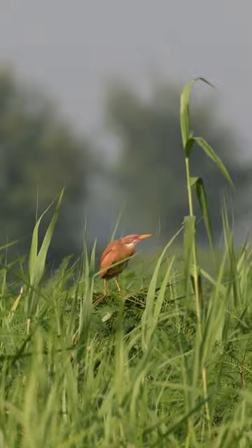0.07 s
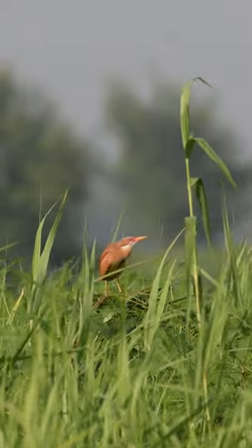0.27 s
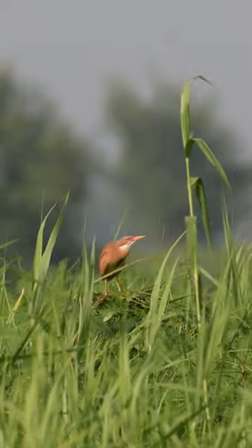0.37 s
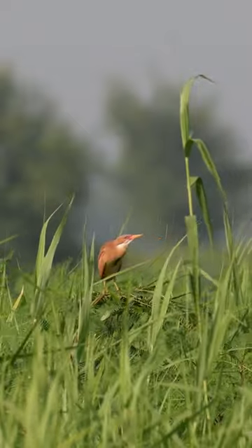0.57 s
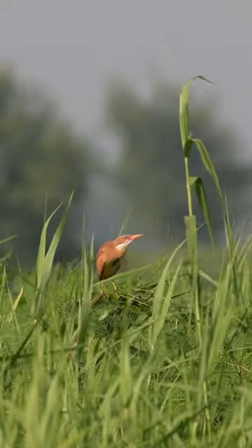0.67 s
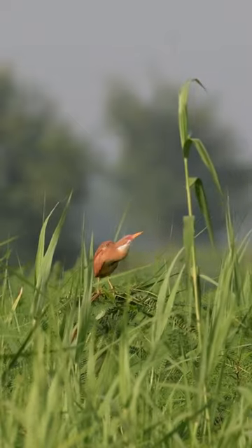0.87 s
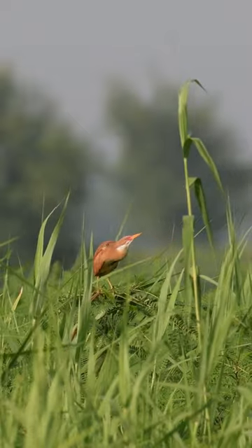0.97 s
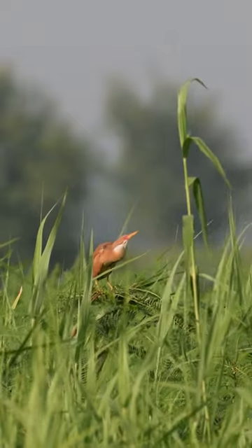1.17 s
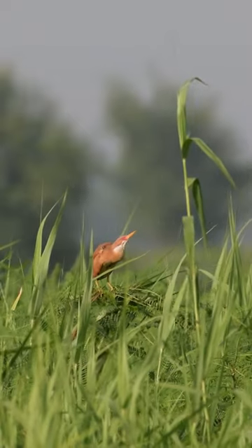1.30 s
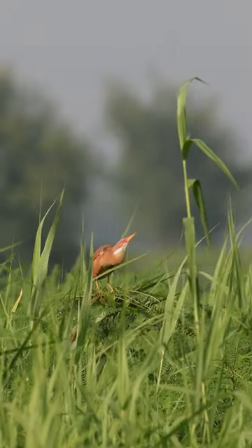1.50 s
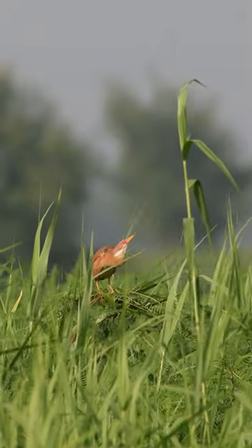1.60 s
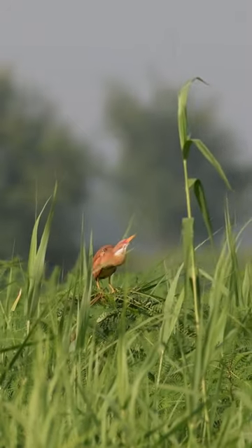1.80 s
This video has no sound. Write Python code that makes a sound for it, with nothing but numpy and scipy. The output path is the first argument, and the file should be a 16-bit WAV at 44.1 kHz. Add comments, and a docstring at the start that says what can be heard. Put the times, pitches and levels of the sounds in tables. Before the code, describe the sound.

A small bird repeats a thin, high chattering phrase six times, roughly every 0.33 s from 0.05 s: ticks, rising-loudness trill, pips, a low peep growing stronger later. After a tiny silent start, wind thumps low on the left, strongest at 0.3-0.4 s, dying away after 0.8 s. Faint quavering whistles fall at 0.13 and 1.63 s, left. High insect buzz and steady open-air hiss continue; reeds scatter the song briefly.

```python
"""A reed bed in the open air: close to the microphone a small warbler repeats one thin phrase three times a second.
Its ticks, fast trill, pips and whistles are sine notes with bending pitch; the stems scatter the song by convolution.
A second bird, leaning left, slurs down twice as a falling, quavering sine; on the left an insect buzzes high,
a throbbing band of noise. Shaped low noise is wind buffeting the left microphone and dying away;
behind it all lies a steady hiss of air."""
import sys
import numpy as np
from scipy import signal
from scipy.fft import rfft, irfft
from scipy.io import wavfile
from scipy.ndimage import uniform_filter1d

SR = 44100
rng = np.random.default_rng(int(sys.argv[2]) if len(sys.argv) > 2 else 0)


def unload_wav(signal):
    """Save mono or channel-first audio to the path in sys.argv[1] as 16-bit WAV at rate SR, clipped to [-1, 1]."""
    wavfile.write(
        sys.argv[1],
        SR,
        np.round(np.clip(np.atleast_2d(signal).T, -1, 1) * 32767).astype(np.int16),
    )


N = 81585

# Song phrases: start [t/s], level on top of SONG_DB [level/dB], peep level on top of PEEP_DB [level/dB]
PHRASES = [(0.0545, -1.5, -4), (0.3834, -2, -3.5), (.713, -3, -2), (1.043, -3, 1.5), (1.3708, -2.5, 2.5),
           (1.702, -1, 4)]
# Closing notes: time into phrase [t/s], length [t/s], start, middle and end pitch [f/Hz each],
# level within the phrase [level/dB]
CLOSING_NOTES = [(0.2117, 0.0047, 5560, 4700, 5160, 3.5), (.216, 0.0224, 6520, 6790, 7100, -2),
                 (0.238, 0.004, 6170, 6980, 7900, 1), (0.263, 0.0037, 4500, 3990, 3450, -5.5),
                 (0.2832, 0.0045, 6700, 5820, 4430, -7), (0.2887, 0.0025, 4220, 5420, 6240, 7),
                 (0.292, 0.0028, 5240, 5600, 5850, -2.5)]
# Second bird's slurs: start [t/s], length [t/s], level at the start of the fade [level/dB]
SLURS = [(0.132, 0.2, -44), (1.631, 0.071, -49.5)]
# First reflections from nearby stems: delay after direct sound [t/s], level relative to it [level/dB]
STEM_REFLECTIONS = [(.0037, -12.5), (.0076, -6.5)]
# Insect loudness before the throb: time [t/s], level [level/dB]
INSECT_LEVEL = [(.1, -55), (.82, -54.5), (.9, -57), (1.85, -57.5)]
# Wind force at the left microphone: time [t/s], level [level/dB]
WIND_FORCE = [(.08, -36), (.13, -28.5), (.21, -24), (.28, -26), (.34, -18), (.44, -20), (.50, -27.5),
              (.58, -26), (.66, -32.5), (.80, -31.5), (.85, -40), (1.0, -41), (1.12, -33.5), (1.21, -42.5),
              (1.28, -36), (1.39, -36.5), (1.47, -44), (1.53, -39.5), (1.58, -48), (1.85, -43.5)]
# Single buffets: peak time [t/s], Gaussian half length [t/s], peak level [level/dB]
BUFFETS = [(0.087, 0.0066, -27.5), (0.237, 0.011, -18), (0.308, 0.008, -8.5), (0.384, 0.0062, -9.5),
           (0.398, .005, -11), (.607, 0.0045, -18.5), (0.695, 0.009, -28), (0.749, .012, -29.5),
           (0.806, 0.0085, -25.5), (0.931, 0.0049, -29.5), (1.066, 0.012, -27.5), (1.255, 0.0055, -26.5),
           (1.328, 0.016, -27.5), (1.431, 0.0042, -24.5)]
# Spectrum of the softer wind: frequency [f/Hz], relative density [level/dB per Hz]
WIND_COLOUR = [(20, -23), (35, -0.5), (60, 3), (120, 5.5), (200, -7), (300, -20.5), (500, -33), (1000, -41),
               (3000, -74)]
# Spectrum of the hard buffets: frequency [f/Hz], relative density [level/dB per Hz]
BUFFET_COLOUR = [(30, -12), (100, 3.5), (190, 6.5), (300, -3.5), (450, -14.5), (700, -43), (1200, -56),
                 (3000, -69)]
# Spectrum of the open air: frequency [f/Hz], relative density [level/dB per Hz]
AIR_COLOUR = [(25, 9), (100, 7), (250, 8.5), (450, 1.5), (800, 1.5), (1200, -3.5), (2000, -5.5),
              (3300, -8.5), (5000, -1), (7000, -8), (9000, -12.5), (12000, -16), (15500, -18.5)]
# Narrow dips in the microphone's response: centre [f/Hz], width [f/Hz], depth [0-1]
MIC_DIPS = [(2610, 344, 0.92), (7700, 690, 0.96)]

# warbler: pitches are start, middle, end; "EVERY" runs from one onset to the next
SONG_DB, NOTE_SCATTER_DB, NOTE_JITTER_S, NOTE_DETUNE = -38, 1.14, .0001, .012
TICK_HZ, TICK_S, TICK_EVERY_S, TICK_DB = (6850, 5640, 4400), .0035, .0093, -1
ARCH_HZ, ARCH_S, ARCH_EVERY_S = (4194, 6613, 3800), 0.00921, .01722
TRILL_AT_S, TRILL_DB, TRILL_SWELL_DB_PER_S = .0497, -1, 15.5
PEEP_AT_S, PEEP_S, PEEP_HZ, PEEP_DB = .2445, 0.02, (4514, 4413, 4124), -36.5
BEND = 1.55  # pitch turn: 1 is pointed, 2 is round
# second bird
SLUR_TOP_HZ, SLUR_END_HZ, SLUR_FALL_S, SLUR_FADE_DB_PER_S = 6400, 4010, .021, 121
QUAVER_HZ, QUAVER_DEPTH_HZ, QUAVER_WANDER_HZ = 91.4, 337, 195
# stereo lean: left gains half of it, right loses 0.6 of it; the song reaches the left later
SONG_LEAN_DB, SONG_LAG_S, SLUR_LEAN_DB = 6.5, .00022, 9
# scatter among the reeds, then a late echo (T60: time to fall 60 dB)
REEDS_T60_S, REEDS_DB = 0.13, -6
ECHO_AT_S, ECHO_T60_S, ECHO_DB = .034, .17, -9.5
# insect
INSECT_HZ, INSECT_WIDTH_HZ, STROKE_HZ, STROKE_DEPTH = 9830, 600, 64.3, 0.26
# wind: force at which half the power is hard buffet, then left spill and own eddies on the right
BUFFET_KNEE_DB, WIND_RIGHT_DB, RIGHT_EDDIES_DB = -15.5, -26.5, -31.5
# air, with a steady low murmur of wind on the left
AIR_DB, WIND_MURMUR_DB, WIND_MURMUR_HZ, WIND_MURMUR_WIDTH_HZ = -47.5, -52.5, 685, 524
# microphone
OPEN_S, TOP_HZ = .072, 15750


def warbler():
    """Every phrase has ticks, a trill and closing notes that vary slightly; among the closing notes comes
    a low peep, which grows louder over the later phrases."""
    song = np.zeros(N)
    for start, phrase_db, peep_db in PHRASES:
        for at, length, *pitches, db in ticks(count=5) + trill(count=10) + CLOSING_NOTES:
            loud, late, sharp = rng.standard_normal(3)
            note = chirp(length, np.array(pitches) * (1 + NOTE_DETUNE * sharp))
            note_db = SONG_DB + phrase_db + db + NOTE_SCATTER_DB * loud
            add(song, start + at + NOTE_JITTER_S * late, undb(note_db) * note)
        # the low peep swells to a point while its pitch sags
        peep = chirp(PEEP_S, PEEP_HZ)
        pointed_swell = np.bartlett(len(peep))
        add(song, start + PEEP_AT_S, undb(PEEP_DB + peep_db) * pointed_swell * peep)
    return song


def ticks(count):
    """Opening ticks: very short falling notes, as rows like the closing notes."""
    return [(k * TICK_EVERY_S, TICK_S, *TICK_HZ, TICK_DB) for k in range(count)]


def trill(count):
    """Evenly spaced arches of pitch, each a little louder, as rows like the closing notes."""
    rows = []
    for k in range(count):
        elapsed = k * ARCH_EVERY_S
        db = TRILL_DB + TRILL_SWELL_DB_PER_S * elapsed
        rows.append((TRILL_AT_S + elapsed, ARCH_S, *ARCH_HZ, db))
    return rows


def chirp(length, pitches):
    """A pure note that swells and fades while its pitch turns through three values."""
    u = np.linspace(-1, 1, int(length * SR))
    first, middle, last = pitches
    outer = np.where(u < 0, first, last)
    hz = middle + (outer - middle) * np.abs(u) ** BEND
    swell = (1 - u ** 4) ** 2
    return swell * sine(hz)


def second_bird():
    """A whistle drops, settles into an uneven quaver of pitch and fades."""
    song = np.zeros(N)
    for start, length, db in SLURS:
        t = np.arange(int(length * SR)) / SR
        fallen = 1 - np.exp(-(t / SLUR_FALL_S) ** 2)
        wander = noise(lambda f: np.exp(-(f / QUAVER_HZ) ** 2))[:len(t)]
        quaver = QUAVER_DEPTH_HZ * np.sin(2 * np.pi * QUAVER_HZ * t) + QUAVER_WANDER_HZ * wander
        hz = SLUR_TOP_HZ + fallen * (SLUR_END_HZ - SLUR_TOP_HZ + quaver)
        fade = undb(db - SLUR_FADE_DB_PER_S * t)
        soft_ends = signal.windows.tukey(len(t), .1)
        add(song, start, fade * soft_ends * sine(hz))
    return song


def reeds(song, lean_db, lag_s):
    """Stems return direct sound, first reflections, dense scatter and a late echo, different on each channel."""
    t = np.arange(SR // 3) / SR
    tails = ((.002, REEDS_T60_S, REEDS_DB), (ECHO_AT_S, ECHO_T60_S, ECHO_DB))
    channels = []
    for side, lag in ((1, lag_s), (-1.2, 0)):  # left, right
        response = np.zeros(len(t))
        for at, db in [(0, 0)] + STEM_REFLECTIONS:
            response[int(round((lag + at) * SR))] += undb(db)
        for at, t60, db in tails:
            decay = np.exp(-np.log(1000) * t / t60)
            tail = rng.standard_normal(len(t)) * (t > at) * decay
            response += undb(db) * tail / np.linalg.norm(tail)
        scattered = signal.fftconvolve(song, response)[:N]
        channels.append(undb(side * lean_db / 2) * scattered)
    return np.array(channels)


def insect():
    """A high resonance rasps as noise on the left, throbbing with each wing stroke."""
    t = np.arange(N) / SR
    strokes = 1 + STROKE_DEPTH * np.sin(2 * np.pi * STROKE_HZ * t)
    rasp = undb(curve(INSECT_LEVEL)) * strokes * band(INSECT_HZ, INSECT_WIDTH_HZ)
    return left_only(rasp)


def wind():
    """Eddies rumble on the left port, changing colour in hard buffets; the sheltered right port gets little."""
    t = np.arange(N) / SR
    power = undb(curve(WIND_FORCE)) ** 2
    for at, half, db in BUFFETS:
        power += (undb(db) * np.exp(-((t - at) / half) ** 2 / 2)) ** 2
    force = np.sqrt(power)
    hard = 1 / (1 + (undb(BUFFET_KNEE_DB) / force) ** 2)  # share of power in hard buffets
    soft_part = np.sqrt(1 - hard) * turbulence(WIND_COLOUR)
    hard_part = np.sqrt(hard) * turbulence(BUFFET_COLOUR)
    left = force * (soft_part + hard_part)
    right_eddies = undb(RIGHT_EDDIES_DB) * force * turbulence(WIND_COLOUR)
    return np.array([left, undb(WIND_RIGHT_DB) * left + right_eddies])


def turbulence(colour, steady_s=0.021):
    """Low noise whose own slow swells are evened out, so that the gusts set its level."""
    x = coloured(colour)
    size = int(steady_s * SR)
    mean_power = uniform_filter1d(uniform_filter1d(x ** 2, size), size)
    return x / np.sqrt(mean_power + 1e-9)


def air():
    """Steady noise hisses independently on each channel; on the left a steady low murmur of wind joins it."""
    hiss = undb(AIR_DB) * np.array([coloured(AIR_COLOUR), coloured(AIR_COLOUR)])
    murmur = undb(WIND_MURMUR_DB) * band(WIND_MURMUR_HZ, WIND_MURMUR_WIDTH_HZ)
    return hiss + left_only(murmur)


def undb(db):
    """Decibels to gain."""
    return 10 ** (np.asarray(db) / 20)


def sine(hz):
    """A tone whose phase accumulates a moving frequency."""
    return np.sin(2 * np.pi * np.cumsum(hz) / SR)


def curve(rows):
    """Rows (t/s, value) joined by straight lines."""
    return np.interp(np.arange(N) / SR, *np.array(rows).T)


def noise(gain):
    """Noise of rms 1 whose spectrum follows gain(f/Hz)."""
    f = np.arange(N // 2 + 1) * SR / N + 1e-6
    x = irfft(rfft(rng.standard_normal(N)) * gain(f), N)
    return x / x.std()


def coloured(points):
    """Noise with a spectrum through (f/Hz, level/dB) points, joined on a log frequency axis."""
    hz, db = np.array(points).T
    return noise(lambda f: undb(np.interp(np.log(f), np.log(hz), db)))


def band(hz, width):
    """Noise in one resonance."""
    return noise(lambda f: 1 / (1 + ((f - hz) / width * 2 ** .5) ** 2))


def left_only(x):
    """Place a sound on the left channel alone."""
    return np.outer([1, 0], x)


def add(track, at, sound):
    """Mix a sound into a track at a time in seconds, cut at the track's end."""
    i = min(max(int(at * SR), 0), N)
    track[i:i + len(sound)] += sound[:N - i]


def scene():
    """Birds among the reeds, then insect, wind and air."""
    birds = reeds(warbler(), SONG_LEAN_DB, SONG_LAG_S) + reeds(second_bird(), SLUR_LEAN_DB, 0)
    return birds + insect() + wind() + air()


def record(dry):
    """The microphone has two narrow dips, opens just after the start and cuts the top."""
    f = np.arange(N // 2 + 1) * SR / N
    gain = np.ones(len(f))
    for hz, width, depth in MIC_DIPS:
        gain *= 1 - depth / (1 + ((f - hz) / width) ** 2) ** 2
    is_open = np.arange(N) / SR > OPEN_S
    heard = irfft(rfft(dry) * gain, N) * is_open
    top_cut = signal.ellip(10, .1, 90, TOP_HZ, fs=SR, output="sos")
    return signal.sosfilt(top_cut, heard)


dry = scene()
out = record(dry)
unload_wav(out)
```